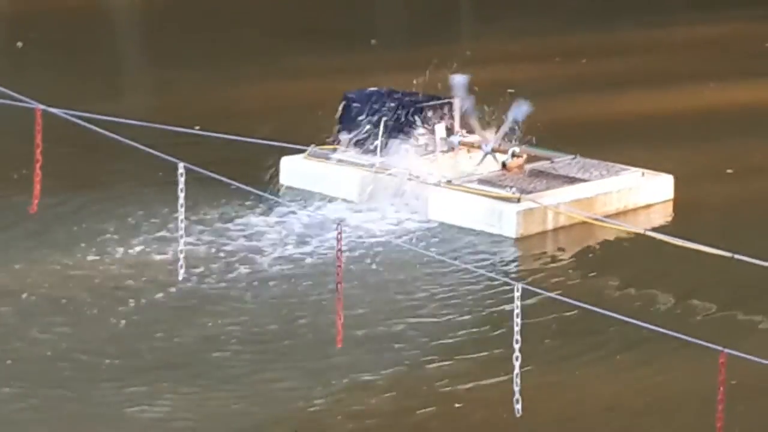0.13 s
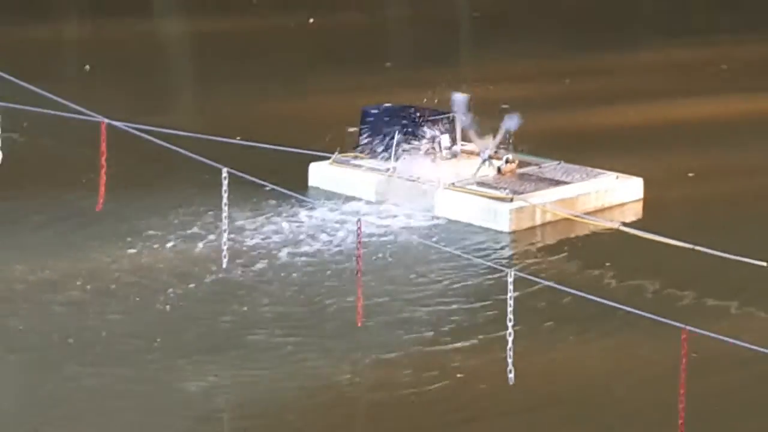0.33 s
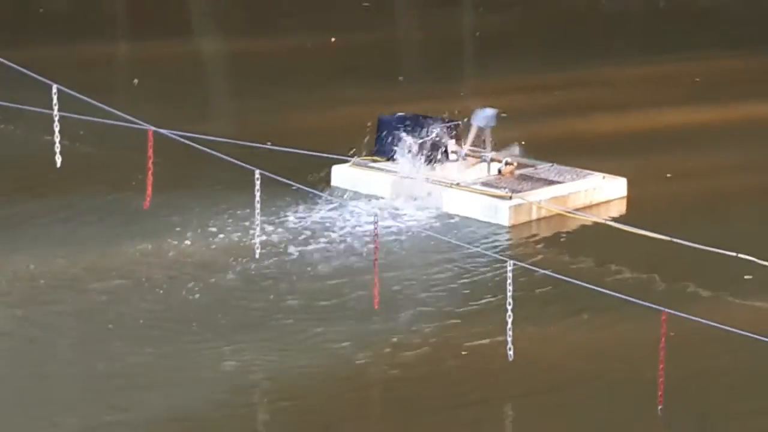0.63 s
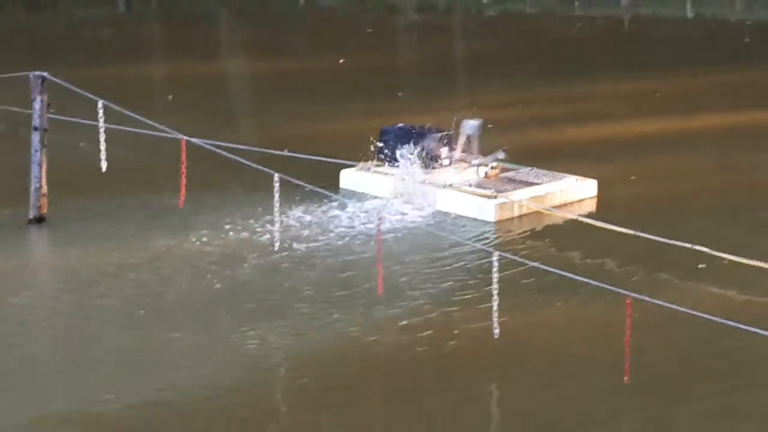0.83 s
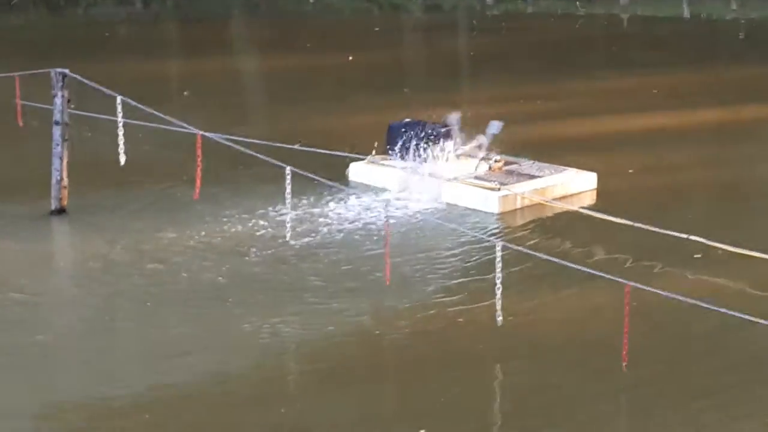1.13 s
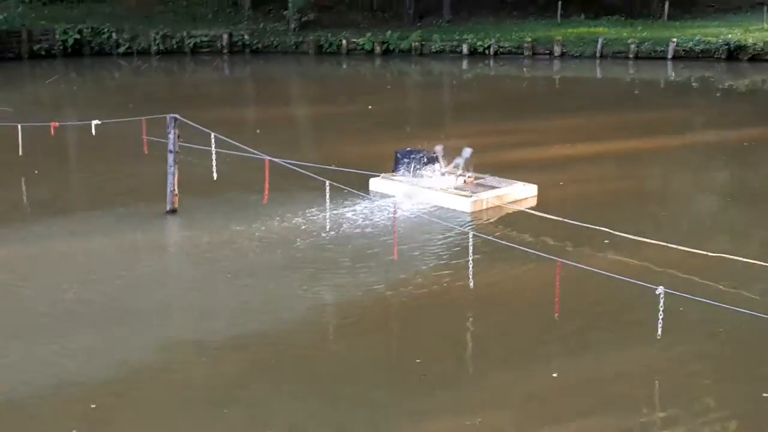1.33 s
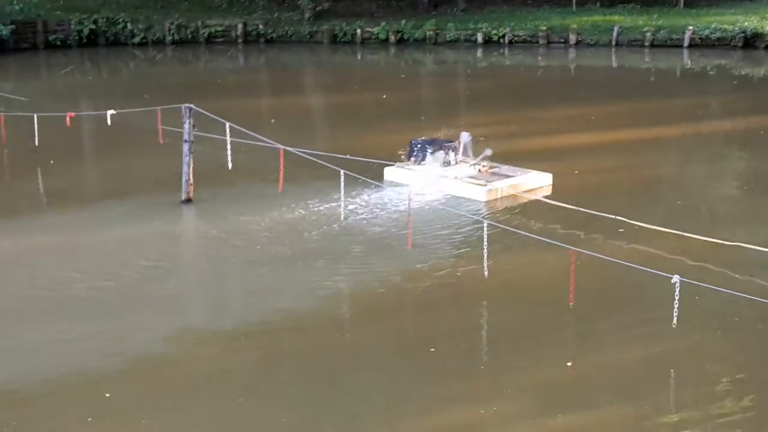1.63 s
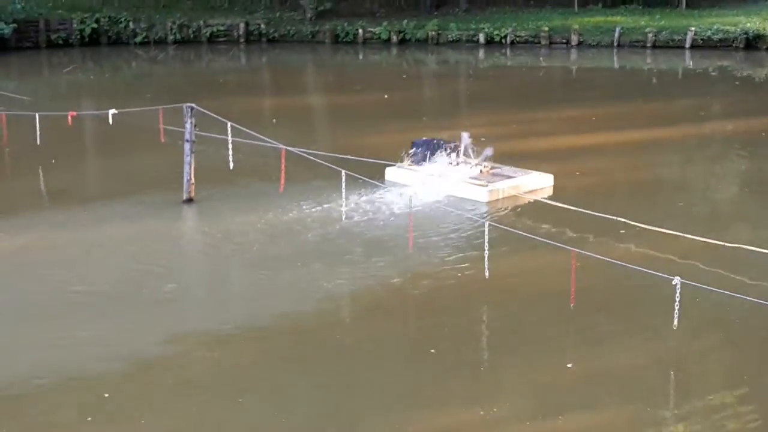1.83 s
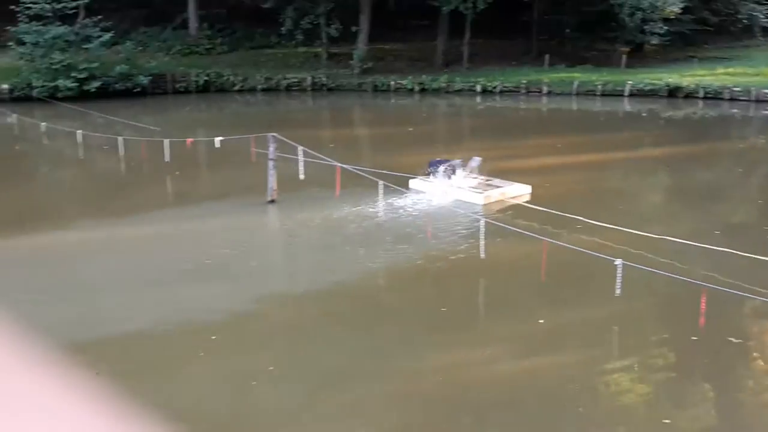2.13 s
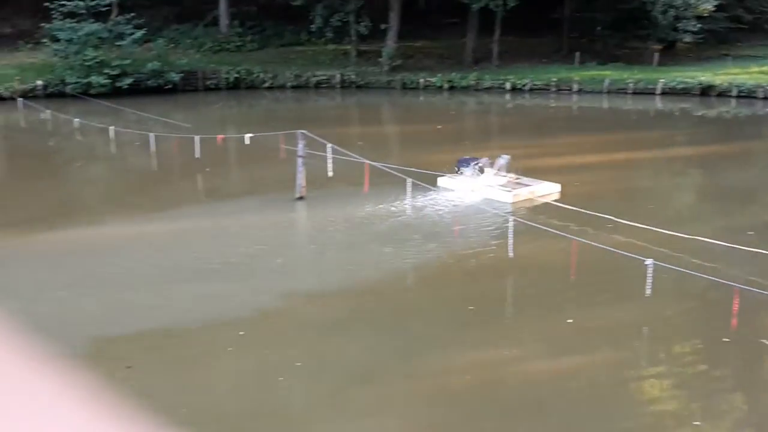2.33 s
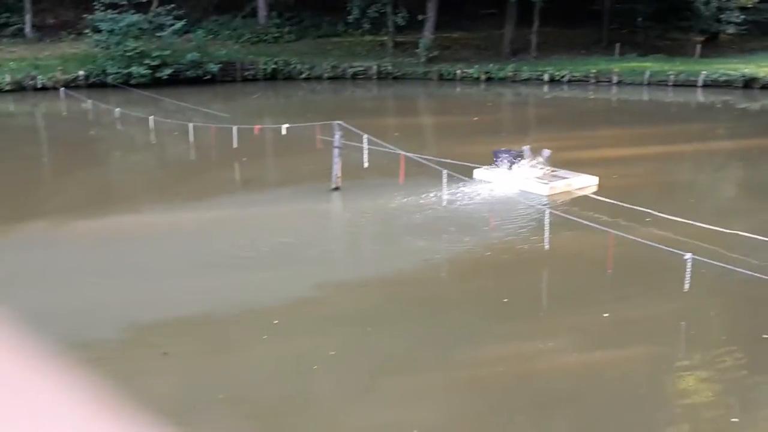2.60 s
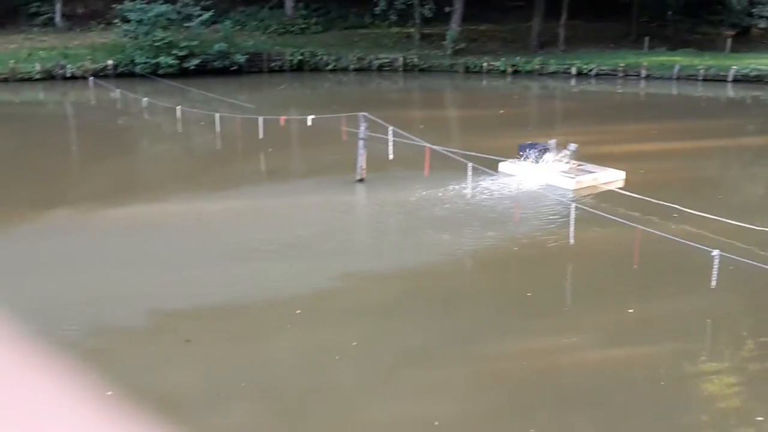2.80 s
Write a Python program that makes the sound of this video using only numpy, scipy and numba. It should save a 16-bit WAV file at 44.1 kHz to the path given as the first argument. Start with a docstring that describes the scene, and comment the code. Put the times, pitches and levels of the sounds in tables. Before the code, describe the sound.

A paddlewheel aerator churns a pond with steady splashing, pattering drops and gurgling bubbles over a faint motor hum. From about halfway, gusts of wind thump and rumble on the microphone, mostly on the left.

```python
"""Water patters and splashes as a paddlewheel aerator churns a pond, over a faint motor hum.
Blades slap the surface and drag air under, which gulps and rings as bubbles; thrown water lands as drops.
Wind puffs thump and rumble on the microphone, mostly on its left port and from halfway on.
The right port is brighter, dulling late on; the recorder cuts a deep notch out of the treble."""
import sys
import numpy as np
from scipy.fft import rfft, irfft
from scipy.io import wavfile
from scipy.ndimage import uniform_filter1d
from numba import njit

SR = 44100
rng = np.random.default_rng(int(sys.argv[2]) if len(sys.argv) > 2 else 0)


def generate_wav(sig):
    """Save sig (samples, or channels by samples) to the path in sys.argv[1] as 16-bit PCM at SR."""
    pcm = np.round(np.clip(np.atleast_2d(sig).T, -1, 1) * 32767).astype(np.int16)
    wavfile.write(sys.argv[1], SR, pcm)


N = 130536
TIME_S = np.arange(N) / SR
BIN_HZ = np.arange(N // 2 + 1) * SR / N
TOP_HZ = 14600


def amp(db):
    return 10 ** (np.asarray(db) / 20)


def unit_rms(x):
    return x / np.sqrt(np.mean(x ** 2))


def over_time(table):
    return np.interp(TIME_S, *np.array(table).T)


def over_bins(table):
    hz, value = np.array(table).T
    return np.interp(np.log(BIN_HZ + 1), np.log(hz), value)


def shape(x, bin_gain):
    return irfft(rfft(x) * bin_gain, N)


def lag(delay_s):
    return np.exp(-2j * np.pi * BIN_HZ * delay_s)


def wander(rate_hz):
    """Random steps, smoothed twice; rms 1."""
    hold = int(SR / rate_hz)
    steps = np.repeat(rng.standard_normal(N // hold + 1), hold)
    return unit_rms(uniform_filter1d(uniform_filter1d(steps, hold), hold)[:N])


@njit
def ring(starts_s, hz, cycles, peaks):
    """Each bubble or drop is a sine that glides up while decaying 50 dB over its cycles."""
    out, rise = np.zeros(N), 0.049
    for k in range(len(starts_s)):
        first, length = int(starts_s[k] * SR), cycles * SR / hz[k]
        for i in range(min(int(length), N - first)):
            age = i / length
            phase = 2 * np.pi * cycles * age * (1 + rise * age / 2)
            out[first + i] += peaks[k] * np.exp(-5.75 * age) * np.sin(phase)
    return out


def shower(per_s, lo_hz, hi_hz, cycles, spread_db):
    """Rings at random times and pitches; spread_db makes a few stand out."""
    draws = np.random.default_rng(rng.integers(2 ** 31))
    when, pitch, strength = draws.random((int(per_s * N / SR), 3)).T
    hz = lo_hz + (hi_hz - lo_hz) * pitch
    peaks = amp(-spread_db * np.log(1 - 0.99 * strength)) * np.sqrt(hz)
    return unit_rms(ring(when * N / SR, hz, float(cycles), peaks))


def spray():
    """Thrown water swells with each blade; it reaches the ports direct, scattered and by a near echo."""
    # falling water's colour at each port: f/Hz, level/dB
    water_left = [(30, -87), (100, -73), (220, -78.5), (310, -68), (450, -81), (700, -76.5), (900, -78.5),
                  (1150, -85), (1500, -84), (1800, -93.5), (2150, -84.5), (2900, -95), (4100, -90),
                  (4700, -99), (5300, -101), (9800, -101), (11200, -97), (14500, -100)]
    water_right = [(30, -99), (100, -84), (220, -78), (440, -82.5), (700, -76.5), (950, -82), (1400, -85.5),
                   (1800, -90), (2200, -88.5), (3100, -89), (4000, -80), (4500, -84.5), (5300, -92),
                   (9400, -96.5), (9800, -83), (10250, -79.5), (11200, -85), (13600, -89), (14500, -98.5)]
    # scattered power, unlike at the two ports: f/Hz, share/1
    scattered = [(100, 0.2), (300, 0.34), (700, 0.1), (1500, 0.44), (4000, 0.34), (5500, 0.8),
                 (10000, 0.44), (14000, .95)]
    # right port's treble contour: t/s, level/dB
    treble = [(0, 1.5), (1.2, 0), (1.8, -0.5), (1.9, -1), (2.2, -3), (2.3, -5), (2.5, -7.5), (2.75, -7),
              (2.96, -7)]
    # scaling of that contour: f/Hz, factor/1
    treble_weight = [(2500, 0.072), (4000, 0.55), (5000, 1.47), (10200, 0.041), (12500, 0.92),
                     (14500, 0.59)]
    blade_hz, throb_db, surge_db = 6.2, 0.19, 0.57
    echo_s, port_lag_s = 0.001394, 32e-6
    blade_phase = 2 * np.pi * np.cumsum(blade_hz * (1 + 0.087 * wander(4.8))) / SR
    swell = amp(throb_db * np.sin(blade_phase) + surge_db * wander(44.92))
    share = over_bins(scattered)
    direct = shape(patter() + splashes(), np.sqrt(1 - share))
    left, right = (swell * (direct + shape(patter(), np.sqrt(share))) for _ in range(2))
    left = shape(left, amp(over_bins(water_left) - 1.5) * (1 + 0.51 * lag(echo_s)) * lag(port_lag_s))
    right = shape(right, amp(over_bins(water_right) - 0.93) * (1 + 0.079 * lag(echo_s)))
    treble_db = over_time(treble)
    dull = shape(right, amp(treble_db.min() * over_bins(treble_weight)))
    fade = (1 - amp(treble_db)) / (1 - amp(treble_db.min()))
    return np.array([left, right + fade * (dull - right)]) * np.sqrt(SR / 2)


def patter(drops_per_s=6500):
    """Drops strike the pond, blurred by fine mist; flat spectrum."""
    # mist relative to drops: f/Hz, level/dB
    mist_colour = [(300, -1), (1000, -2.5), (2200, 1), (4000, -1.5), (10000, -2.5), (14000, -10)]
    drops = shower(drops_per_s, lo_hz=170, hi_hz=TOP_HZ, cycles=4.9, spread_db=4)
    power = uniform_filter1d(np.abs(rfft(drops)) ** 2, size=2000)
    white_drops = unit_rms(shape(drops, power ** -0.5))
    mist_gain = amp(over_bins(mist_colour))
    mist = shape(rng.standard_normal(N), mist_gain)
    return unit_rms(shape(white_drops + mist, 1 / np.hypot(1, mist_gain)))


def splashes():
    """A thrown sheet of water lands as a brief swell of drops; larger drops sound lower."""
    # landings: t/s, in-band level re steady spray/dB, centre f/Hz, fall/s
    landings = [(.02, 6.5, 1300, .015), (.045, 1, 2370, .02), (.065, 6.5, 10500, 0.032),
                (.143, 5, 4000, 0.013), (.215, 2.5, 4230, 0.017), (.282, 6, 2300, .014),
                (.283, 8, 11000, .012), (.426, 6, 11500, .003), (.322, 8, 2000, .016),
                (.37, 2, 1700, 0.028), (.407, 4, 1260, 0.013), (.423, 4.5, 2370, .014),
                (.51, 4, 2680, 0.038), (.685, 3.5, 1980, .02), (.753, 3, 4000, .022),
                (1.072, 4.5, 2010, .022), (1.335, -2, 4000, 0.0194), (1.375, 7.5, 1300, 0.018),
                (1.545, 6, 4000, .015), (1.605, 5.5, 1440, 0.017), (1.61, 6, 3900, 0.013),
                (1.752, 7, 3300, .022), (1.775, 5.5, 1200, 0.038), (2.005, 3.5, 1200, .045),
                (2.036, 7.5, 3310, 0.019), (2.106, 4, 3500, .014), (2.212, 9, 2720, .018),
                (2.215, 6.5, 11000, 0.0098), (2.298, 6.5, 1290, .015), (2.53, 7, 1200, 0.013),
                (2.596, 8, 3740, .015), (2.615, 5, 10500, 0.034), (2.792, 5.5, 10500, .012),
                (2.86, -0.5, 2430, 0.015), (2.94, 4.5, 1380, .012)]
    rise_s, width_oct = 0.0071, 0.67
    out, drops = np.zeros(N), patter(drops_per_s=3500)
    for peak_s, db, hz, fall_s in landings:
        t = TIME_S - peak_s
        swell = np.exp(-(t / np.where(t < 0, rise_s, fall_s)) ** 2)
        band = np.exp(-(np.log2((BIN_HZ + 1) / hz) / width_oct) ** 2)
        out += amp(db) * swell * shape(drops, band)
    return out


def gulps():
    """An air pocket dragged under by a blade breaks into three bubbles, each weaker than the last."""
    # first bubble of each pocket: t/s, level/dB, f/Hz
    pockets = [(.01, -38.5, 207), (.131, -36, 730), (.282, -34, 630), (.307, -39.5, 619), (.333, -37, 634),
               (.37, -40.5, 386), (.39, -42, 407), (.438, -36, 670), (.495, -39, 260), (.62, -36, 675),
               (.674, -37.5, 640), (.677, -39.5, 188), (.772, -36, 746), (.783, -38, 614), (.86, -36, 193),
               (.948, -38, 287), (1.074, -35, 688), (1.114, -35, 219), (1.179, -33.5, 653),
               (1.31, -40.5, 554), (1.422, -36, 690), (1.585, -36.5, 373), (1.672, -35, 213),
               (1.977, -36.5, 626), (2.002, -37.5, 788), (2.008, -33.5, 726), (2.016, -38, 650),
               (2.044, -39.5, 560), (2.116, -37, 647), (2.379, -39, 577), (2.535, -38.5, 206),
               (2.738, -37.5, 727), (2.839, -44.5, 273), (2.87, -41, 344), (2.879, -34, 568),
               (2.895, -39, 676), (2.932, -38, 256)]
    scatter_s, step_db, cycles = 0.0086, 7.5, 14.5
    out, order = np.zeros(N), np.arange(3)
    for start_s, db, hz in pockets:
        delay, detune = rng.random((2, 3))
        starts_s = start_s + scatter_s * delay * order
        bubble_hz = hz * (1 + 0.24 * (detune - 0.5) * order)
        out += ring(starts_s, bubble_hz, cycles, amp(db - step_db * order))
    return out


def slaps():
    """A blade hits the surface flat: a short, dull burst of spray."""
    # blade hits: t/s, level/dB
    hits = [(0.283, -50), (.411, -44), (0.777, -39), (1.18, -38), (1.588, -39.5), (2.004, -43), (2.38, -42)]
    # slap colour: f/Hz, relative level/dB
    colour = [(100, -10), (350, -11.5), (800, 5), (1500, -10.5), (4000, -19.5), (10000, -25),
              (14500, -19.5)]
    envelope, decay_s = np.zeros(N), 0.0032
    burst = np.exp(-TIME_S[:SR // 10] / decay_s)
    for start_s, db in hits:
        first = int(start_s * SR)
        envelope[first:first + len(burst)] += amp(db) * burst[:N - first]
    return envelope * unit_rms(shape(rng.standard_normal(N), amp(over_bins(colour))))


def churn():
    """Bubbles ring in the water behind the wheel; the largest gurgle low."""
    # bubbling: t/s, gain/dB
    activity = [(0, -0.5), (.75, 0.5), (.87, -4), (1.3, 0), (2.2, -1), (2.45, -2), (2.78, -2), (2.87, 1.5),
                (2.96, -5)]
    bubbles = amp(-55) * shower(per_s=260, lo_hz=223, hi_hz=901, cycles=24.5, spread_db=0)
    gurgles = amp(-56) * shower(per_s=45, lo_hz=153.6, hi_hz=325.5, cycles=15, spread_db=2)
    return amp(over_time(activity)) * (bubbles + gurgles)


def wind():
    """Eddies rumble on each port; a puff is a sharp push, then a short low boom."""
    # left port's rumble: t/s, level/dB
    left_rumble = [(0, -50), (.2, -49.5), (.4, -45), (.55, -56), (.85, -47.5), (1.3, -52), (1.45, -49),
                   (1.55, -33.5), (1.75, -39.5), (2.0, -39.5), (2.1, -45), (2.25, -39), (2.7, -44.5),
                   (2.8, -43), (2.96, -40.5)]
    # rumble colour: f/Hz, relative level/dB
    colour = [(15, -27), (35, -14), (62, 2.5), (100, -7), (160, -18.5), (300, -21.5), (700, -47),
              (2000, -97)]
    # puffs: t/s, left level/dB, right level/dB, push length/s, boom re push/dB
    puffs = [(0.4, -34, -41, 0.0029, -11), (0.839, -38.5, -44, 0.0045, -10), (1.353, -15, -55, 0.0017, -5),
             (1.4, -30.5, -19.5, 0.0024, -28), (1.503, -30.5, -46.5, .0024, -21),
             (1.5131, -24, -42, 0.0017, -22), (1.519, -22, -39, 0.0031, -12.5),
             (1.534, -24, -50, 0.00245, -13.5), (1.78, -35, -28.5, 0.0024, -21),
             (1.793, -24, -57, 0.0037, -20), (1.922, -30, -42, 0.0035, -8), (1.9973, -28, -44, 0.002, -21),
             (2.0021, -21.5, -42, 0.0026, -15.5), (2.0183, -25, -41, 0.0027, -14),
             (2.262, -32.5, -56, 0.0037, -8), (2.38, -34, -36, 0.0013, -25),
             (2.411, -31.5, -51, 0.0041, -8), (2.555, -30.5, -47, 0.0051, -12),
             (2.651, -31.5, -53, 0.0042, -26), (2.715, -29, -44, 0.0036, -21)]
    right_rumble_db = -61.5
    boom_hz, attack_s, decay_s = 67, 0.01, 0.019
    out = np.zeros((2, N))
    for port, db in enumerate((over_time(left_rumble), right_rumble_db)):
        eddies = shape(rng.standard_normal(N), amp(over_bins(colour)))
        out[port] = amp(db) * unit_rms(eddies * amp(0.78 * wander(16)))
    for start_s, left_db, right_db, push_s, boom_db in puffs:
        t = TIME_S - start_s
        push = (1 - 2 * (t / push_s) ** 2) * np.exp(-(t / push_s) ** 2)
        age_s = np.maximum(t, 0)
        envelope = (1 - np.exp(-age_s / attack_s)) * np.exp(-age_s / decay_s)
        boom = amp(boom_db) * envelope / envelope.max() * np.cos(2 * np.pi * boom_hz * age_s)
        out += amp([[left_db], [right_db]]) * (push + boom)
    return out


def motor():
    """A faint hum that wavers in pitch and level."""
    hum_hz, level_db, flutter_db = 210.7, -58.5, 6
    phase = 2 * np.pi * np.cumsum(hum_hz * (1 + 0.0178 * wander(8.1))) / SR
    return amp(level_db) * unit_rms(np.sin(phase) * amp(flutter_db * wander(6.74)))


def bank(water):
    """Hard surfaces on the bank add dulled echoes."""
    # echoes: delay/s, gain/1
    reflections = [(.0161, 0.34), (.0242, 0.14), (0.0302, 0.35)]
    cutoff_hz = 2450
    echoes = sum(gain * lag(delay_s) for delay_s, gain in reflections)
    return shape(water, 1 + echoes / (1 + (BIN_HZ / cutoff_hz) ** 2))


def scene():
    """Aerator on the pond, wind at the microphone."""
    return bank(spray() + churn() + gulps() + slaps()) + motor() + wind()


def record(dry):
    """The recorder notches the treble and cuts the top."""
    lo_hz, hi_hz, edge_hz = 5026, 9420, 526
    inside = np.clip(np.minimum(BIN_HZ - lo_hz, hi_hz - BIN_HZ) / edge_hz, 0, 1.2)
    notch_db = -34.5 * inside ** 2
    above = np.clip((BIN_HZ - TOP_HZ) / 200, 0, 1)
    return shape(dry, amp(notch_db) * (1 - above) ** 2)


dry = scene()
out = record(dry)
generate_wav(out)
```